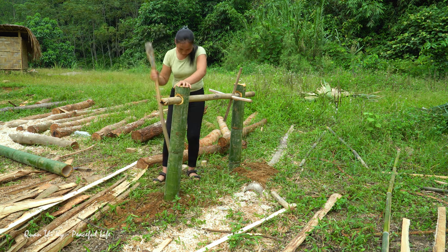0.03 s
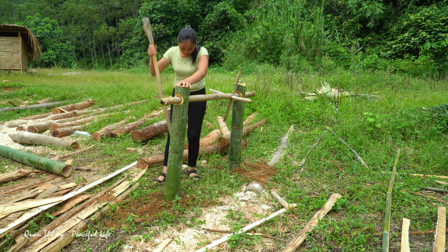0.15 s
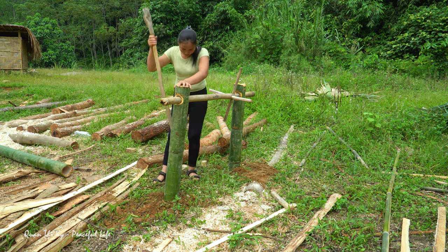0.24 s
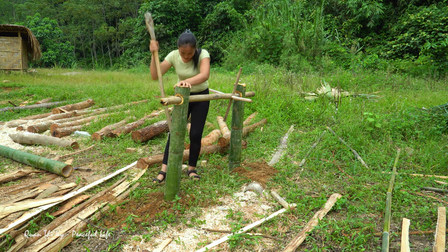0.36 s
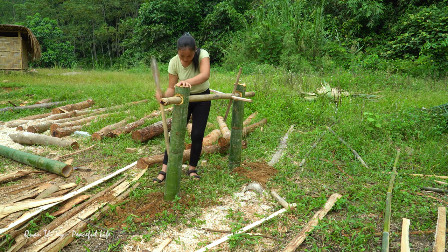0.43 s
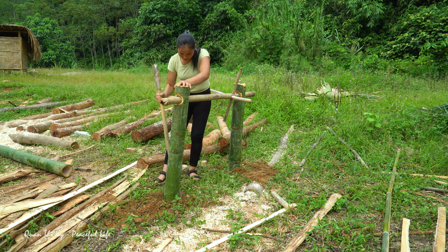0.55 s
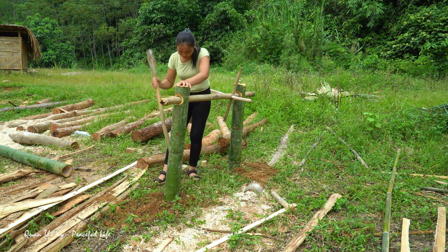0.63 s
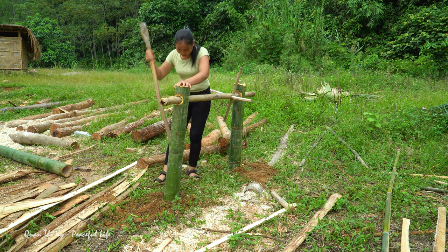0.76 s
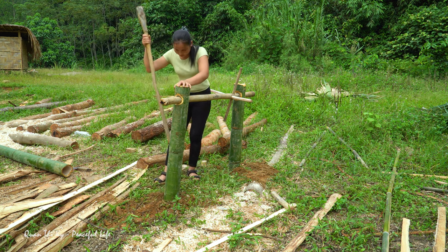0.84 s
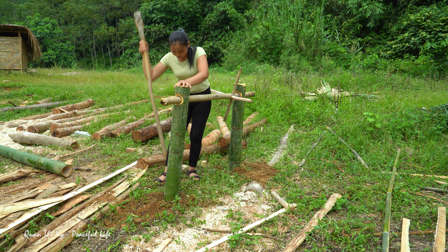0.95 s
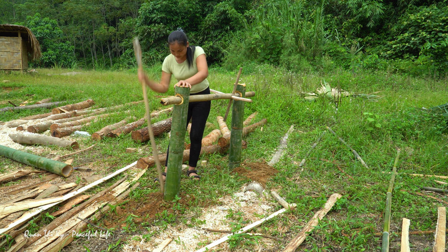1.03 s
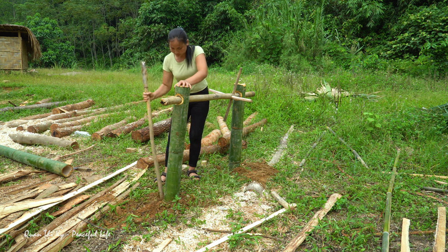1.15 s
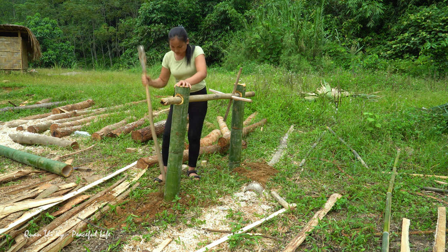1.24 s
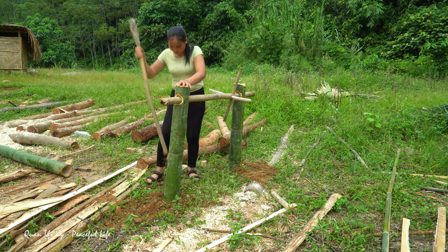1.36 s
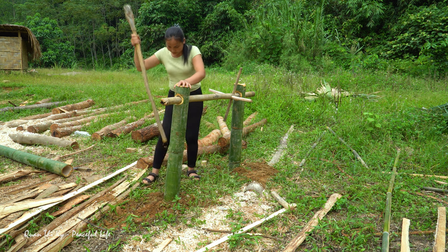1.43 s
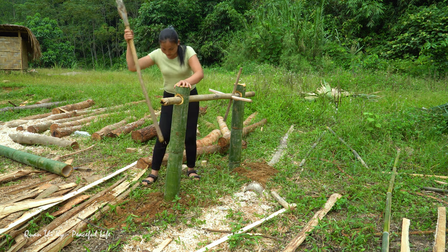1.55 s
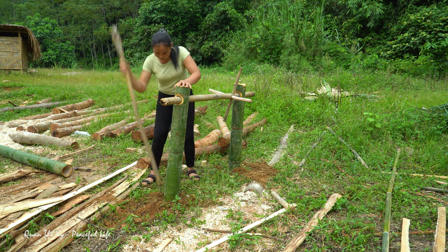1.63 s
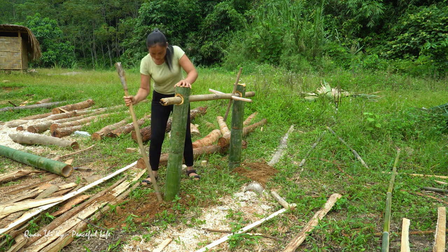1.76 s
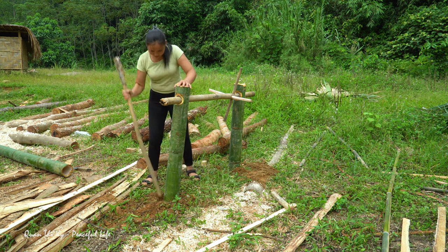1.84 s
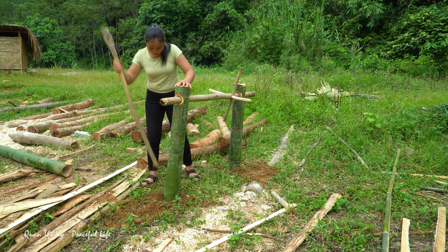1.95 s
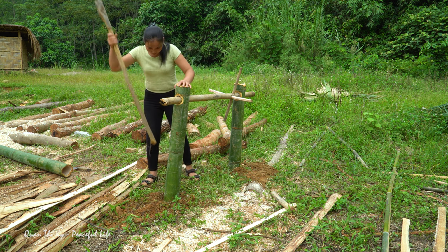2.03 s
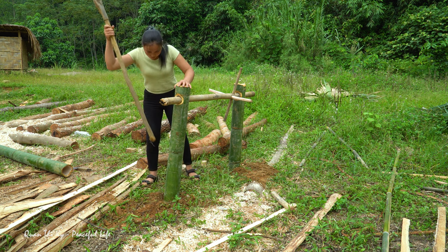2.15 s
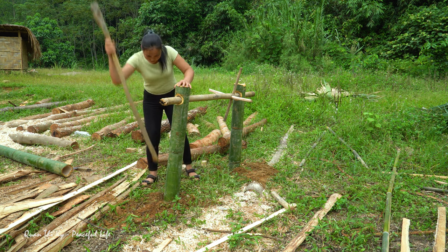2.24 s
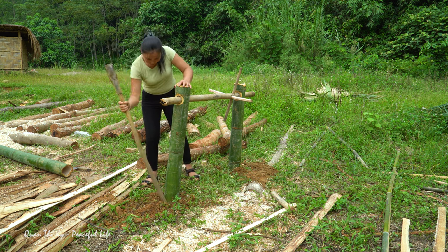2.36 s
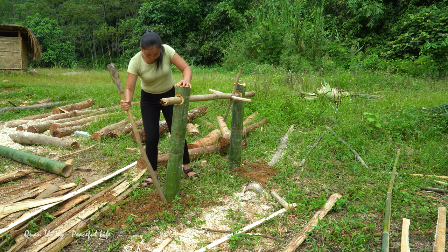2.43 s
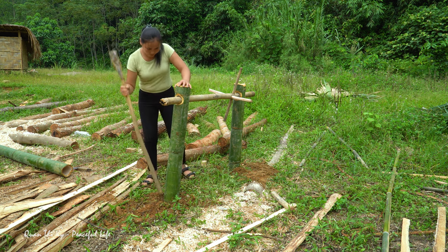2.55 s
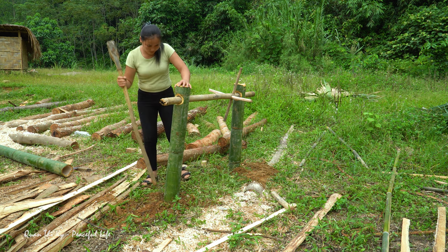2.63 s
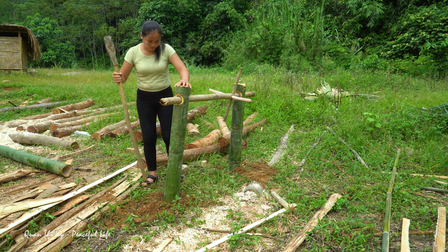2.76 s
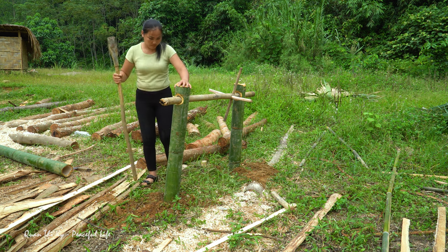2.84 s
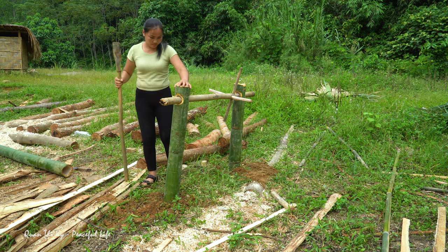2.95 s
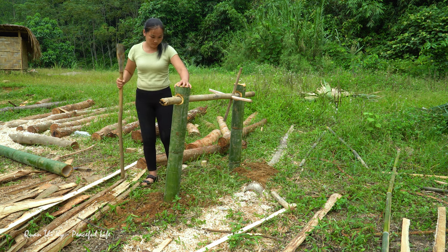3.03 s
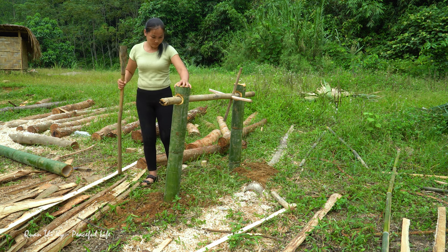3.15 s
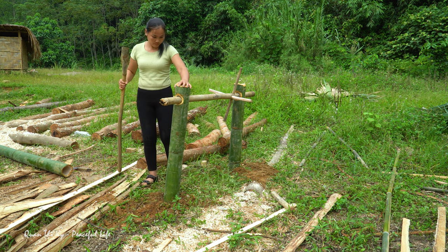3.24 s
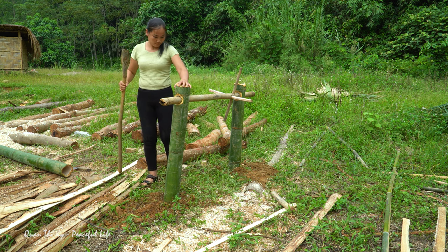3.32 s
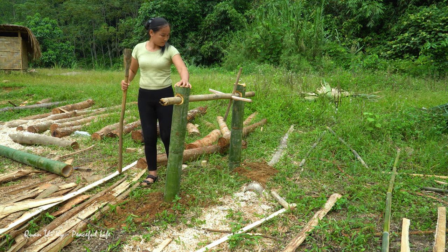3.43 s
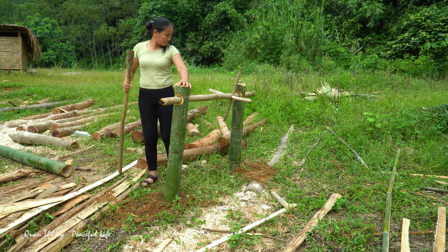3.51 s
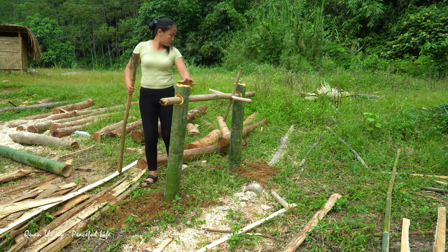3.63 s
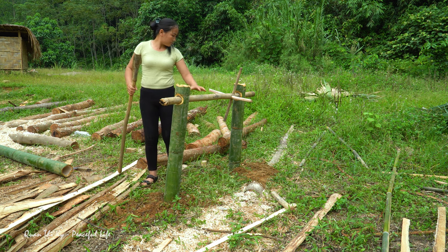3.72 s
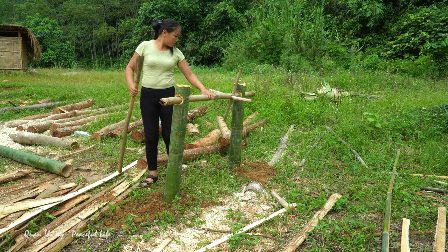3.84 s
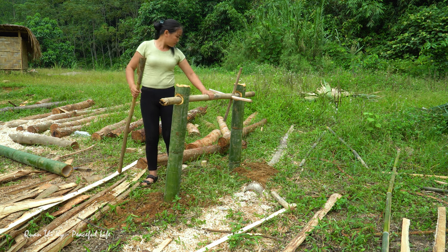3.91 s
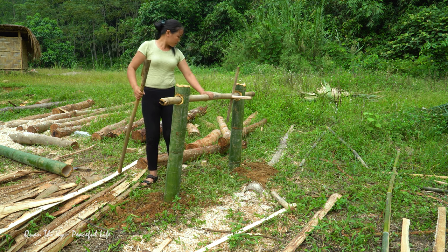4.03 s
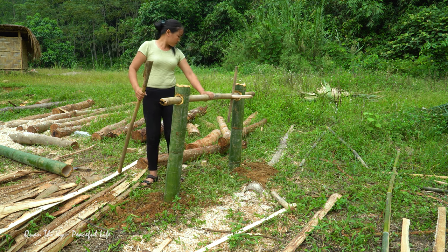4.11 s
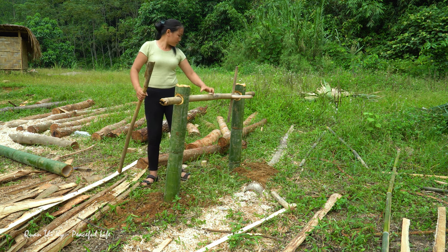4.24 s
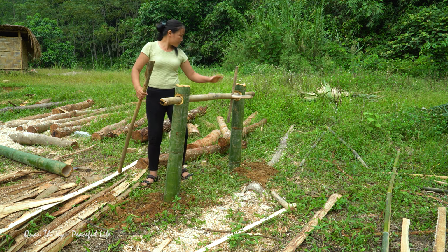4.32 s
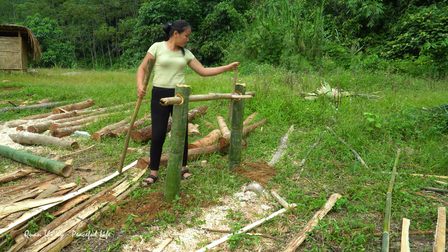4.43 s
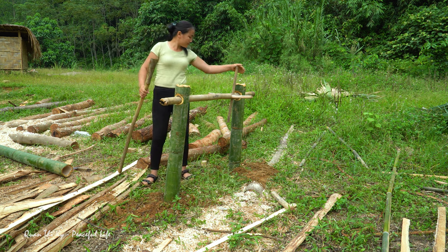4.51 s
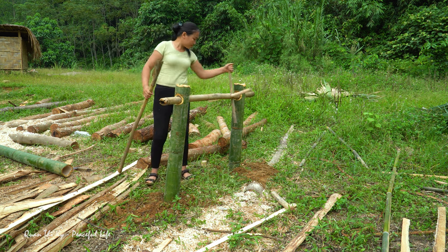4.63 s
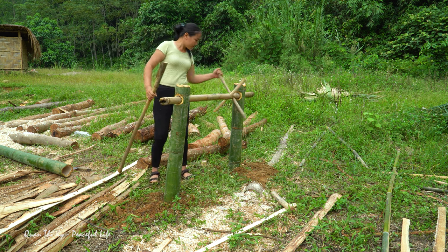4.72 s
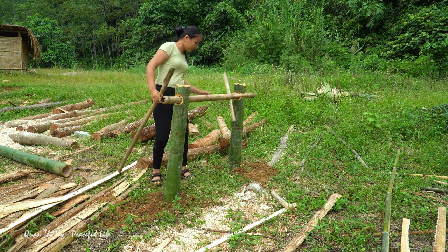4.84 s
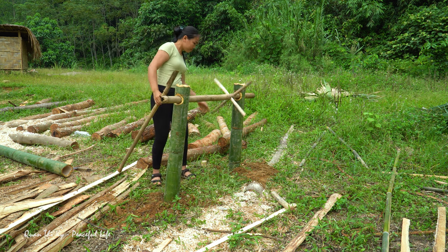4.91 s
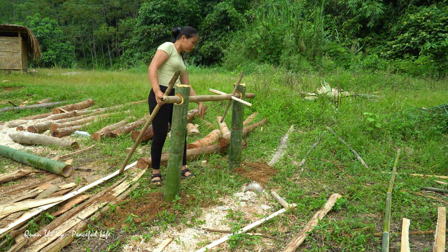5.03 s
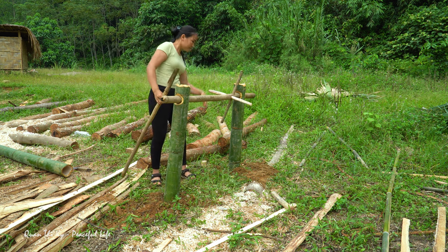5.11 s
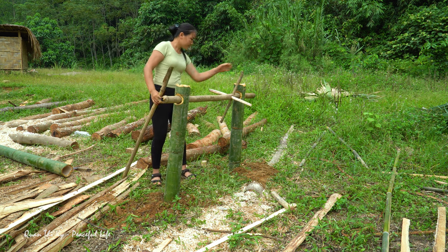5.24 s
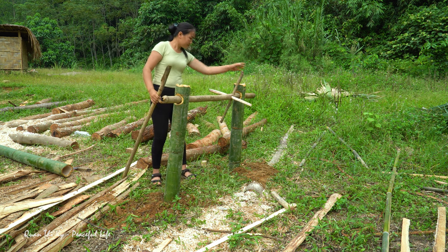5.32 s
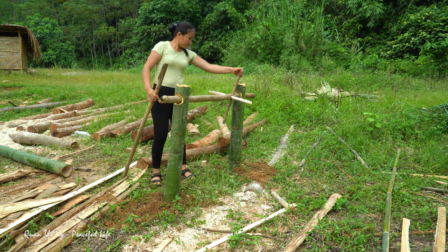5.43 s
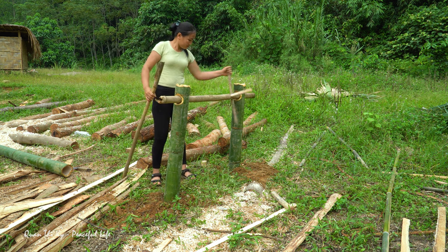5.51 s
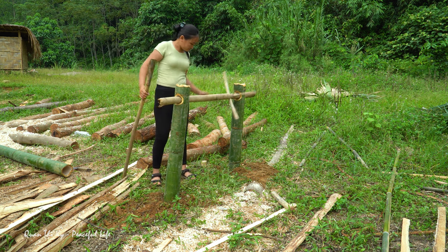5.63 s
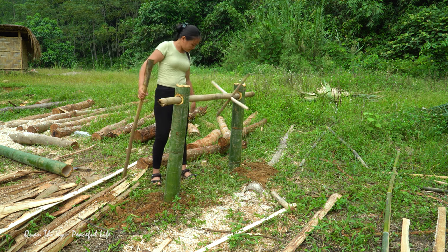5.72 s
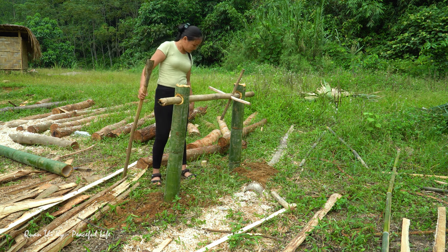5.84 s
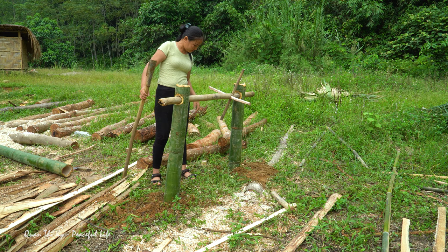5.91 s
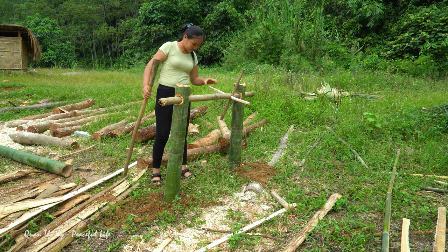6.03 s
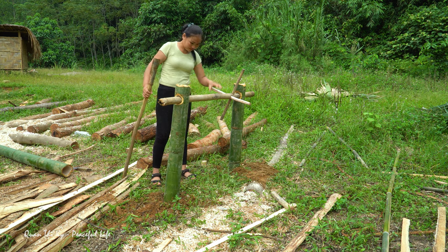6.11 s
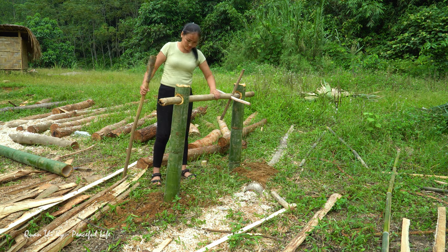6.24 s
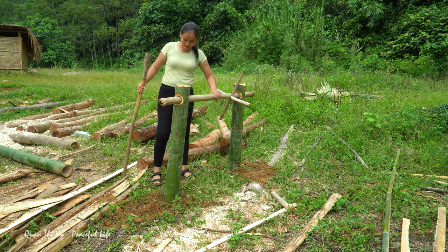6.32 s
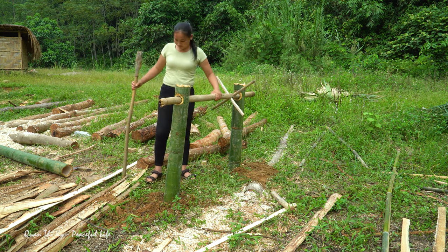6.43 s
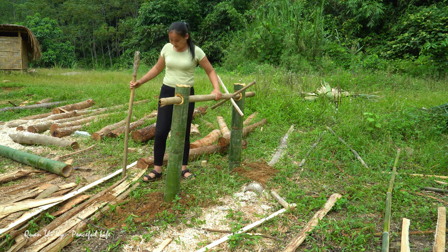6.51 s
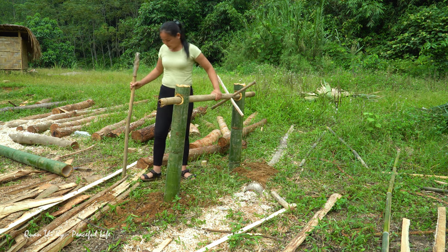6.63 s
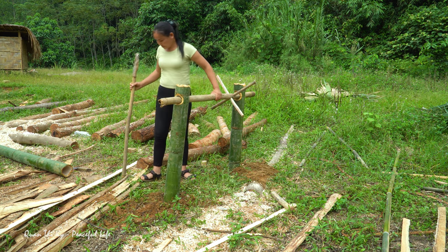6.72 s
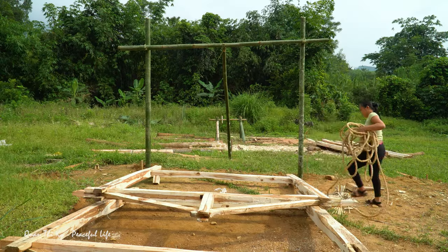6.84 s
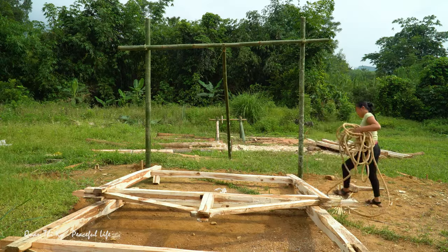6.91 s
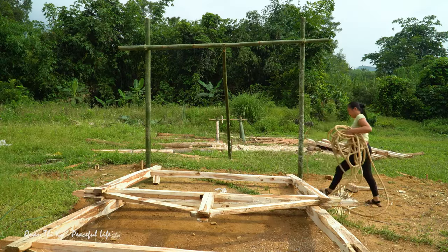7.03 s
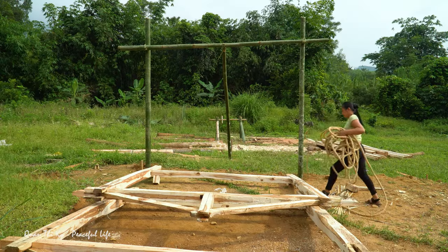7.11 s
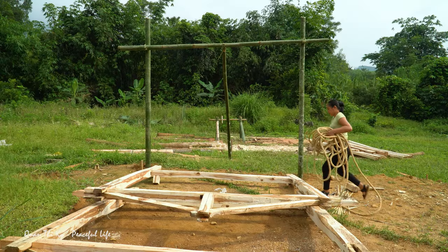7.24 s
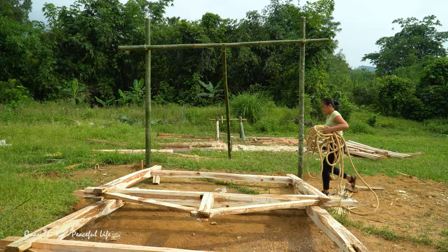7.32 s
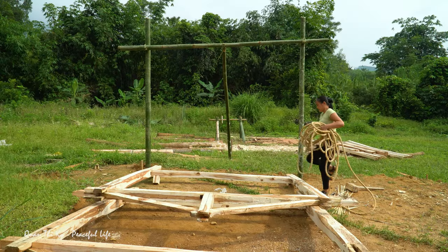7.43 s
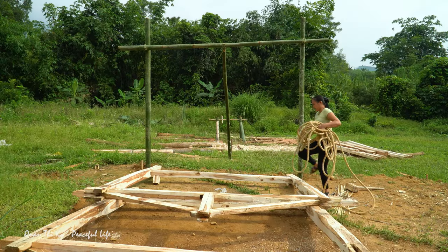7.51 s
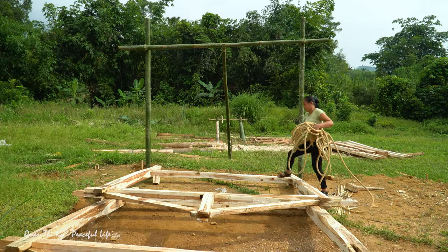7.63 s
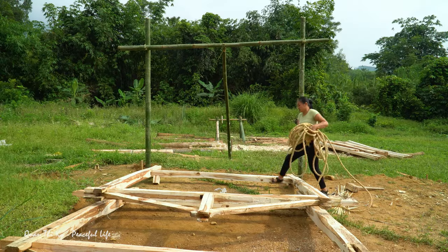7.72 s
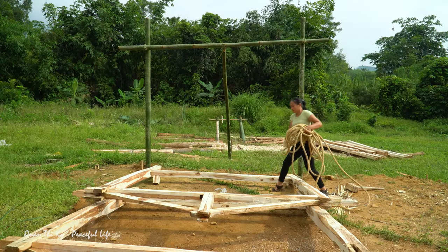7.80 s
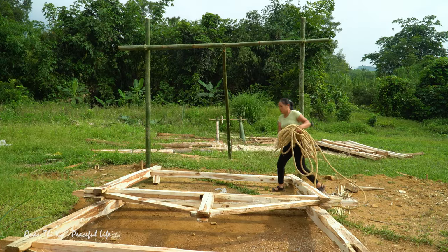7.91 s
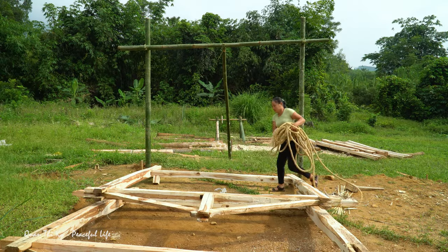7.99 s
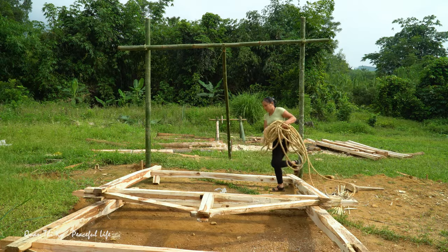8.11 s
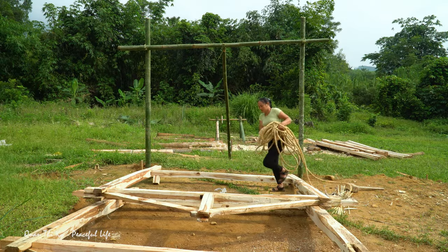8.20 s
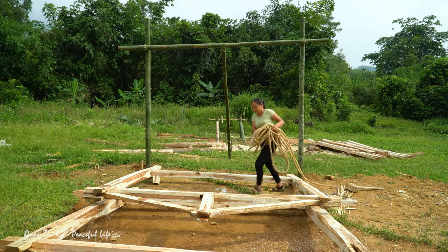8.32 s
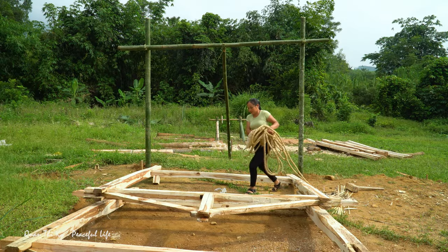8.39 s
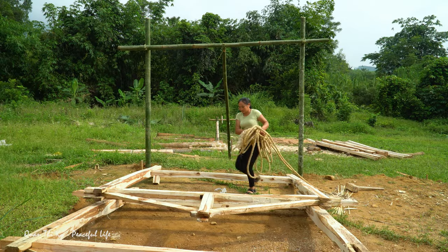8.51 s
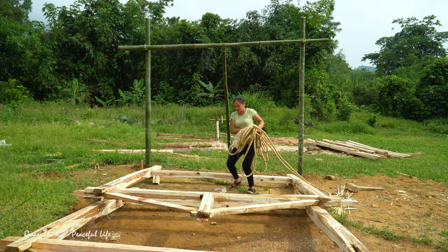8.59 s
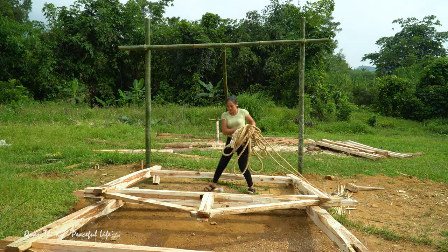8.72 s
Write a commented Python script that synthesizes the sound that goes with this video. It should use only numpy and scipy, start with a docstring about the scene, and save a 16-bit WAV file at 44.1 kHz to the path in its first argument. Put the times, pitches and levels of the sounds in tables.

```python
"""An insect trills close by in a clearing, over a far insect chorus and the wash of the open air.
A wooden pole tamps the earth round a post four times: decaying modes of soil, post and pole, with gritty noise.
The place then cuts to another spot, where a cricket chirps in fours and someone walks past carrying rope,
heard as light knocks, ticks and rustles. Insect strokes are gliding tone pulses; air and chorus are shaped noise."""
import sys
import numpy as np
from scipy import signal
from scipy.fft import rfft, irfft
from scipy.io import wavfile
from scipy.ndimage import uniform_filter1d

SR = 44100
rng = np.random.default_rng(int(sys.argv[2]) if len(sys.argv) > 2 else 0)


def materialize(psi):
    """Save the field psi as 16-bit PCM at rate SR to the path in sys.argv[1].

    A 1-D psi becomes a single channel; in a 2-D psi each row is a channel.
    """
    bounded = np.clip(np.atleast_2d(psi).T, -1, 1)
    quanta = np.round(bounded * 32767).astype(np.int16)
    wavfile.write(sys.argv[1], SR, quanta)


N = 386316
CUT_S = 6.856  # the change of spot

# Modes of the wooden pole. Each row: frequency in Hz, relative level in dB, decay time t60 in seconds.
POLE_MODES = [(810, 5, 0.019), (915, 0, 0.04), (1004, 3, 0.025), (1152, -0.5, 0.029), (1212, -13, 0.081),
              (1388, 4.3, 0.023), (1602, 2, 0.0099), (1920, -4, 0.03), (2328, 0.5, 0.021),
              (2980, -4.5, .03), (3410, -3.5, 0.025), (3720, -6, 0.062)]
# The four tamps. Each row: start in seconds, pole's rise in seconds, contact in seconds before the ring dies,
# soil level in dB, post level in dB, centre of the post's ring in Hz, pole's lower ring in dB, its centre in Hz,
# its spread in octaves, pole's upper ring in dB, its centre in Hz, crack level in dB, crack's brightest Hz,
# delay in seconds until the soil's crunch peaks, crunch level in dB, level in dB of fine sand on top of it.
TAMPS = [(0.5257, 0.00035, 0.0031, -26, -17, 500, -14, 1040, .11, -19, 2200, -15, 3000, .004, -29, -50),
         (1.127, 0.0029, 0.0055, -36, -24.5, 800, -15.5, 1260, .18, -25, 3400, -24, 7000, 0.0035, -25.5, -44),
         (1.7572, .006, 0.01, -43, -39, 700, -35, 1100, .5, -36, 3000, -25.5, 5000, .0095, -28.5, -37),
         (2.3746, 0.0021, 0.0033, -31, -17.5, 600, -17, 1330, .25, -32, 2300, -30, 4000, 0.014, -25, -31)]


def amp(db):
    """Decibels to amplitude."""
    return 10 ** (np.asarray(db) / 20)


def evened(x):
    """Scale to an rms of one."""
    return x / np.sqrt(np.mean(x ** 2) + 1e-20)


def read(points, hz):
    """Read a curve of (Hz, value) points along a logarithmic frequency axis."""
    f, value = np.transpose(points)
    return np.interp(np.log(hz + 1), np.log(f + 1), value)


def add(mix, s, sound):
    """Lay a sound into the mix from s seconds on, cut off at the end."""
    part = mix[..., round(s * SR):][..., :sound.shape[-1]]
    part += sound[..., :part.shape[-1]]


def bell(hz, centre_hz, octaves):
    """A bell-shaped weight over octaves round a centre."""
    return np.exp(-.5 * (np.log2((hz + 1) / centre_hz) / octaves) ** 2)


def echoes(x, t60, wet_db):
    """Scatter from trees and ground: a decaying random tail, another one for each microphone."""
    t = np.arange(SR // 4) / SR
    tail = rng.standard_normal((2, len(t))) * amp(-60 * t / t60) * (t > .003)
    tail /= np.linalg.norm(tail[0])
    return amp(wet_db) * signal.fftconvolve(x[None], tail, axes=1)[:, :N]


def placed(x, lean_db, lead):
    """A source off centre: left minus right in dB, and the left microphone leads by some samples."""
    return np.array([np.roll(x, -lead), x]) * amp([[lean_db / 2], [-lean_db / 2]])


def air_at(shape, likeness, level_db, patchy_db):
    """The wash at one spot: random short-time spectra with drifting louder and softer patches."""
    # Each row: frequency in Hz, left minus right in dB.
    lean_points = [(60, 0.0), (180, -1), (550, -0.5), (1650, 0.0), (4970, 0), (15000, -2.0)]
    frames, hz = N // 256 + 5, np.fft.rfftfreq(1024, 1 / SR)
    a, b, c, d, patches = rng.standard_normal((frames, 513, 5)).T
    patches = uniform_filter1d(patches, size=12, axis=0)
    patches = evened(uniform_filter1d(patches, size=14, axis=1))
    same = np.clip(read(likeness, hz), -1, 1)[:, None]
    half_lean = amp(read(lean_points, hz)[:, None] / 2)
    left, other = a + 1j * b, c + 1j * d
    right = same * left + np.sqrt(1 - same ** 2) * other
    spectra = np.array([left * half_lean, right / half_lean])
    spectra *= amp(read(shape, hz)[:, None] + patchy_db * patches)
    wash = signal.istft(spectra, nperseg=1024, noverlap=768)[1][:, :N]
    return amp(level_db) * evened(wash)


def air():
    """Leaves, distant water and breeze as shaped noise; louder at the second spot."""
    # Open air at each spot. Each row: frequency in Hz, relative level in dB per Hz.
    first_shape, second_shape = [(20, -1.5), (60, -9), (130, -9.5), (250, -11.5), (500, -5.5), (800, -6.5),
                                 (1450, -0.5), (2300, -3.5), (4500, -10), (6000, -6), (7200, -14),
                                 (9500, -16.5), (11500, -24), (16000, -27.5)], [(20, -8), (60, -10.5), (150, -13.5), (330, -7), (600, -8.5),
                                                (1350, -3), (2000, -5.5), (4500, -8.5), (5900, -9.5),
                                                (7200, -13.5), (9500, -14), (11000, -14.5), (12500, -22.5),
                                                (16000, -29)]
    # How alike the two microphones hear it. Each row: frequency in Hz, left-right likeness from -1 to 1.
    first_same, second_same = [(60, 0.96), (130, 0.84), (290, 0.85), (640, 0.88), (1410, 0.98),
                               (3100, 0.76), (6820, -0.23), (15000, -0.15)], [(60, 0.91), (130, 0.91), (290, 0.94), (640, 0.95),
                                               (1410, 0.99), (3100, 0.81), (6820, 0.49), (15000, -0.64)]
    first = air_at(first_shape, first_same, level_db=-41, patchy_db=0.98)
    second = air_at(second_shape, second_same, level_db=-38.5, patchy_db=0.49)
    return np.where(np.arange(N) < CUT_S * SR, first, second)


def chorus():
    """Far insects blur into narrow noise bands that throb; low bands reach both microphones alike."""
    # Far chorus and one low steady band. Each row: from and to in seconds, centre in Hz, width in Hz,
    # rms level in dB ahead of the lean, throbs per second, throb depth from 0 to 1.
    bands = [(0, CUT_S, 8390, 550, -52, 27.3, 0.15), (0, CUT_S, 7830, 340, -56.5, 23, 0.19),
             (0, CUT_S, 6390, 140, -60.5, 5.3, 0.94), (0, CUT_S, 5320, 780, -51.5, 27.1, 0.21),
             (CUT_S, 9, 8440, 590, -51.5, 28.3, 0.44), (CUT_S, 9, 5340, 400, -53.5, 21, .2),
             (CUT_S, 9, 6380, 300, -54, 34, .2), (CUT_S, 9, 10800, 900, -64, 15.3, .2),
             (CUT_S, 9, 1340, 370, -53, 2.4, .1)]
    t, hz, out = np.arange(N) / SR, np.fft.rfftfreq(N, 1 / SR), np.zeros((2, N))
    for t0, t1, centre_hz, width_hz, db, rate, depth in bands:
        mid, *sides = rng.standard_normal((3, N))
        noise = np.array(sides) + (5500 / centre_hz) ** 2 * mid
        band = irfft(rfft(noise) * np.exp(-.5 * (2 * (hz - centre_hz) / width_hz) ** 2), N)
        throb = 1 + depth * np.cos(2 * np.pi * (rate * t + rng.random()))
        out += amp(db) * evened(band * throb) * ((t >= t0) & (t < t1))
    return out * amp([[-.7], [.7]])  # a little louder on the right


def stroke(length_s, start_hz, drop_hz, bend, skew):
    """One wing stroke: a smooth tone pulse whose pitch sags; skew under 1 swells early and trails off."""
    u = np.linspace(0, 1, round(length_s * SR))
    phase = 2 * np.pi * np.cumsum(start_hz - drop_hz * u ** bend) / SR
    return np.sin(np.pi * u ** skew) * np.sin(phase)


def cricket():
    """Four strokes a chirp, swelling from a faint first one."""
    # Each row: time in seconds, level in dB that the swell shifts from stroke to stroke.
    chirps = [(6.9795, -41), (7.2075, -39.5), (7.4121, -40), (7.64, -39), (7.861, -39), (8.071, -38.5),
              (8.2924, -39), (8.5254, -40)]
    out = np.zeros(N)
    for (s, db), chance in zip(chirps, rng.standard_normal((len(chirps), 4, 3))):
        for k, swell_db in enumerate([-3.5, 5.5, 7.0, 7.5]):
            late, loud, high = chance[k]
            pulse = stroke(.016, 6760 + 35 * high, 400, 1.1, 0.66)
            add(out, s - .005 + 0.0214 * k + .0005 * late, amp(db + swell_db + .8 * loud) * pulse)
    return placed(out, -2.6, lead=2) + echoes(out, 0.079, -6)


def triller():
    """Pairs of wing strokes, the second a little stronger; lower and fainter when the effort drops."""
    # Stretches of even pace, brisk or dragging, with stops between some of them.
    # Each row: start in seconds, gap between pairs in seconds, number of pairs, effort from 0 to 1.
    stretches = [(.022, .0367, 7, .97), (.279, .0399, 7, .95), (.558, .037, 11, .95), (.965, .0442, 7, .88),
                 (1.361, .0398, 5, .9), (1.56, .0373, 6, .92), (1.784, .0363, 18, .93),
                 (2.437, .0368, 38, .95), (3.836, .0383, 9, .97), (4.181, .0357, 9, .98),
                 (4.502, .0435, 3, .9), (4.672, .026, 1, .4), (4.698, .0414, 5, .55), (4.905, .038, 4, .88),
                 (5.057, .0367, 45, .95), (6.708, .0387, 4, .97)]
    pairs = [(s + k * gap_s, 1 - effort) for s, gap_s, count, effort in stretches for k in range(count)]
    strokes = [(-.0045, -38.5, 0.0104), (.0073, -38, 0.0108)]  # delay s, dB at full effort, length s
    out = np.zeros(N)
    for (start, slack), chance in zip(pairs, rng.standard_normal((len(pairs), 2, 4))):
        for (delay, db, length_s), (loud, high, sag, late) in zip(strokes, chance):
            pulse = stroke(length_s, 5760 - 350 * slack + 35 * high, 620 + 110 * sag, 1.9, 0.85)
            add(out, start + delay + 0.00044 * late, amp(db - 4.8 * slack + 1.47 * loud) * pulse)
    return placed(out, -3.2, lead=-1) + echoes(out, 0.065, -9)


def bursts():
    """Every burst of grit as (s of the peak, dB, rise s, fall s, brightest Hz, spread octaves)."""
    # Crack of a tamp: rise in seconds, fall in seconds, spread in octaves.
    crack_rise_s, crack_fall_s, crack_octaves = 0.00051, 0.0016, 1
    # Crunch of soil, then fine sand: longest rise in seconds, fall in seconds, brightest Hz, spread in octaves.
    crunch_rise_s, *crunch_rest = 0.0076, 0.01, 3100, 1.08
    sand_rise_s, *sand_rest = .004, 0.0045, 11500, 0.4
    # Ticks of twigs and grit. Each row: peak in seconds, level in dB, brightest Hz.
    ticks = [(.4895, -28, 4000), (2.559, -39.5, 5000), (4.618, -56, 9000), (5.4605, -46, 8000),
             (5.698, -47, 7000), (6.8185, -43, 10000), (6.862, -36, 7000), (6.876, -35.5, 10000),
             (6.922, -51, 9000), (7.124, -44, 11000), (7.191, -36, 8000), (7.74, -49, 9500),
             (7.908, -42, 600), (8.529, -49, 10000)]
    # Rustles of grass and cloth. Each row: peak in seconds, level in dB, swell in seconds, brightest Hz.
    rustles = [(.11, -51, .045, 11000), (1.44, -58, .035, 11000), (3.87, -55, .035, 12000),
               (4.25, -56, .045, 12000), (5.657, -45, .028, 9000), (5.671, -40, 0.031, 2500),
               (8.41, -45, .02, 10000), (8.71, -49, .012, 12000)]
    for s, *_, crack_db, crack_hz, delay_s, crunch_db, sand_db in TAMPS:
        yield s + crack_rise_s, crack_db, crack_rise_s, crack_fall_s, crack_hz, crack_octaves
        yield s + delay_s, crunch_db, min(crunch_rise_s, delay_s), *crunch_rest
        yield s + delay_s, sand_db, min(sand_rise_s, delay_s), *sand_rest
    for s, db, hz in ticks:
        fall_s = 0.0051 * (8000 / hz) ** 0.26  # duller ticks last longer
        yield s, db, .0016, fall_s, hz, 1.16
    for s, db, swell_s, hz in rustles:
        yield s, db, swell_s, swell_s, hz, 1


def grit():
    """Bursts of tiny uneven clicks, partly different at each microphone; the top treble is dull."""
    out, t, hz = np.zeros((2, N)), np.arange(8192) / SR, np.fft.rfftfreq(8192, 1 / SR)
    for s, db, rise_s, fall_s, centre_hz, octaves in bursts():
        mid, *sides = rng.standard_normal((3, 8192)) * amp(2.7 * rng.exponential(1, 8192))
        colour = bell(hz, centre_hz, octaves) / np.hypot(1, (hz / 12500) ** 2)
        clicks = evened(irfft(rfft(mid + 0.37 * np.array(sides)) * colour))
        envelope = np.where(t < rise_s, (t / rise_s) ** 2, np.exp((rise_s - t) / fall_s))
        add(out, s - rise_s, amp(db) * clicks * envelope)
    return out


def ring(modes, t, contact_s, centre_hz=1000, octaves=30):
    """Modes in random phase and slightly uneven strength; they die once the contact ends."""
    hz, db, t60 = np.transpose(modes)[..., None]
    uneven, phase = rng.standard_normal((2, len(modes), 1))
    decay_db = 60 * np.maximum(t - contact_s, 0) / t60
    size = amp(db + 0.68 * uneven - decay_db) * bell(hz, centre_hz, octaves)
    return (size * np.sin(2 * np.pi * hz * t + np.pi * phase)).sum(0)


def blow(t, rise_s, contact_s, soil_db, post_db, post_hz, pole_db, centre_hz, octaves):
    """One blow shakes the packed soil, the hollow post and the pole by its own amounts."""
    # Packed soil, then hollow post. Each row: frequency in Hz, relative level in dB, decay time t60 in seconds.
    soil_modes, post_modes = [(204, -3, 0.08), (241, -3.5, 0.06), (306, -6.5, 0.062)], [(426, -24.5, 0.45), (472, 0, 0.05), (559, -9, 0.14),
                                            (688, -4, 0.029), (798, -1, 0.045), (906, -1, 0.081)]
    soil = amp(soil_db) * ring(soil_modes, t, contact_s)
    post = amp(post_db) * ring(post_modes, t, contact_s, post_hz, 0.98)
    light = amp(pole_db) * ring(POLE_MODES, t, contact_s, centre_hz, octaves)
    return (soil + post) * (1 - np.exp(-t / 0.0019)) ** 2 + light * (1 - np.exp(-t / rise_s))


def pole():
    """Tamps ring the pole low and high at once; light knocks and footfalls ring one part of it."""
    # Light knocks and footfalls. Each row: start in seconds, soil level in dB, post level in dB,
    # pole level in dB, centre of the pole's ring in Hz.
    knocks = [(0, -57, -43, -36.5, 1010), (0.4878, -47, -30.5, -28, 2300), (.515, -60, -56, -36, 1300),
              (1.149, -35, -50, -60, 1000), (2.388, -44, -30, -27.5, 3200), (2.557, -53, -51, -31.5, 3100),
              (3.08, -60, -50, -44, 900), (5.206, -60, -50, -34, 860), (7.88, -42, -47, -41, 1200),
              (7.908, -38, -42, -35, 1200)]
    out, t = np.zeros(N), np.arange(SR // 4) / SR
    for s, rise_s, contact_s, soil_db, post_db, post_hz, lower_db, lower_hz, octaves, upper_db, upper_hz, *_ in TAMPS:
        upper = amp(upper_db) * ring(POLE_MODES, t, contact_s, upper_hz, octaves=.55)
        upper *= 1 - np.exp(-t / .0004)
        lower = blow(t, rise_s, contact_s, soil_db, post_db, post_hz, lower_db, lower_hz, octaves)
        add(out, s, upper + lower)
    for s, soil_db, post_db, pole_db, centre_hz in knocks:
        add(out, s, blow(t, rise_s=0.0014, contact_s=0.0029, soil_db=soil_db, post_db=post_db, post_hz=700,
                         pole_db=pole_db, centre_hz=centre_hz, octaves=0.33))
    # small bodies radiate no deep bass
    out = signal.sosfilt(signal.butter(2, 160, "high", fs=SR, output="sos"), out)
    return placed(out, -1.3, lead=0) + echoes(out, 0.069, -24.0)


def scene():
    """Both spots, from the open air up to the tamping pole."""
    return air() + chorus() + cricket() + triller() + grit() + pole()


def record(dry):
    """The level dips to a quarter at the cut between spots, then a low-pass limits the band."""
    dip_s, edge_hz = 0.0058, 15730
    joined = dry * np.clip(abs(np.arange(N) / SR - CUT_S) / dip_s, .25, 1)
    low_pass = signal.firwin(1023, edge_hz, window=("kaiser", 9), fs=SR)
    return signal.oaconvolve(joined, low_pass[None], "same")


dry = scene()
out = record(dry)
materialize(out)
```